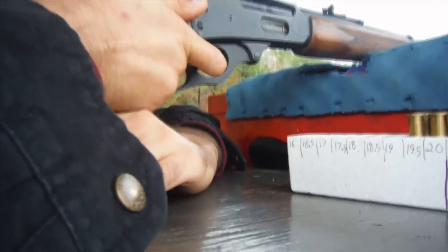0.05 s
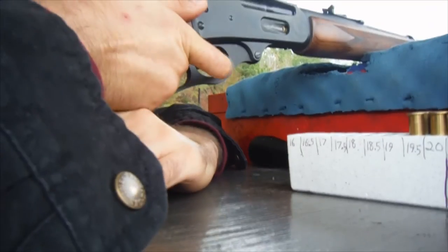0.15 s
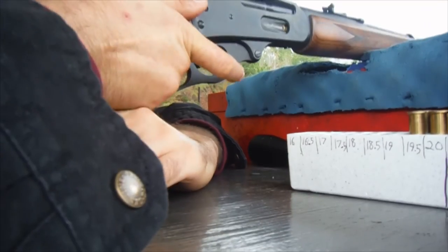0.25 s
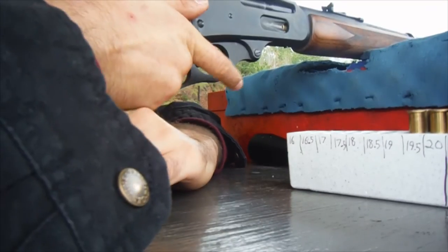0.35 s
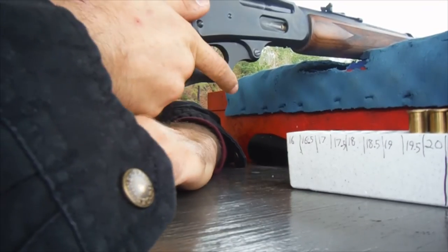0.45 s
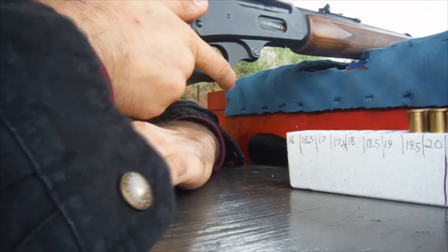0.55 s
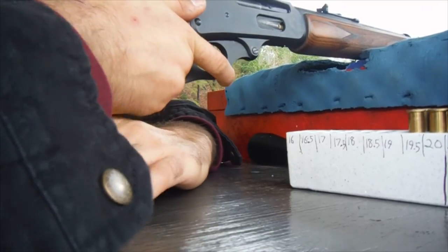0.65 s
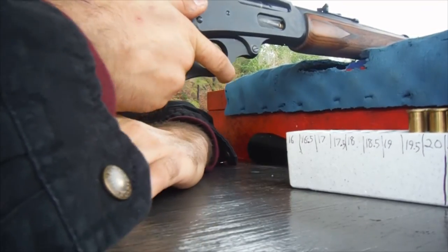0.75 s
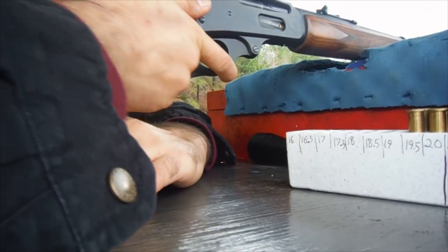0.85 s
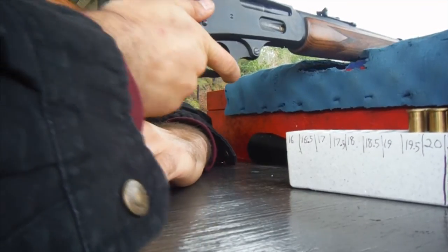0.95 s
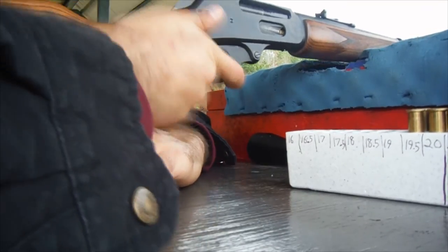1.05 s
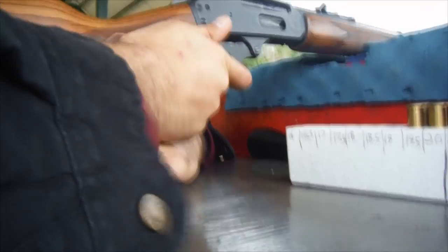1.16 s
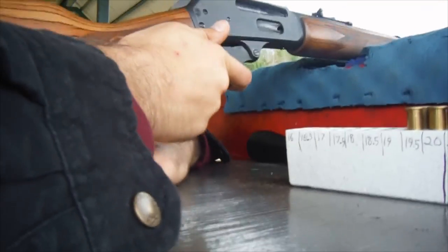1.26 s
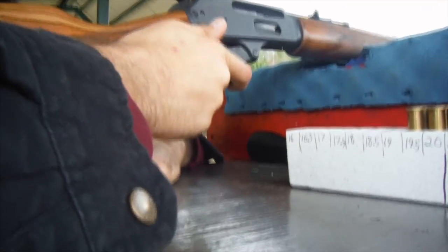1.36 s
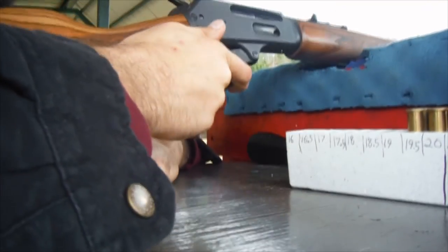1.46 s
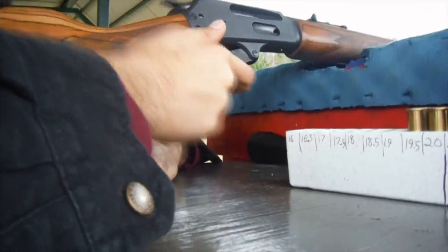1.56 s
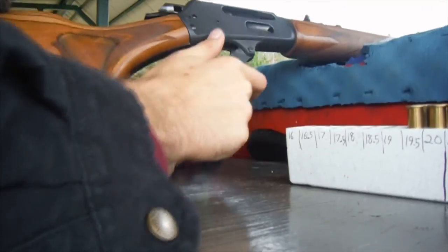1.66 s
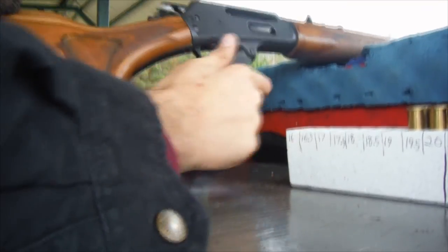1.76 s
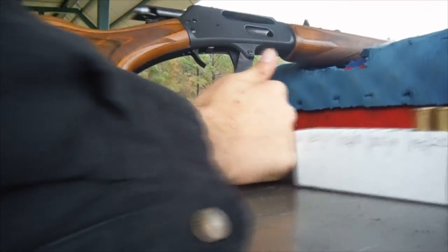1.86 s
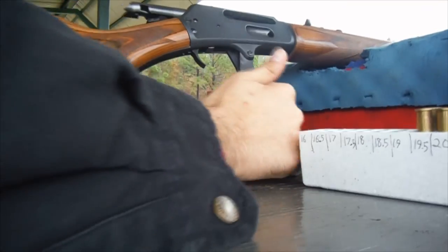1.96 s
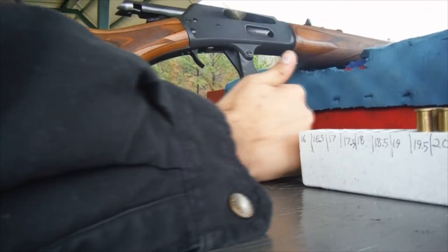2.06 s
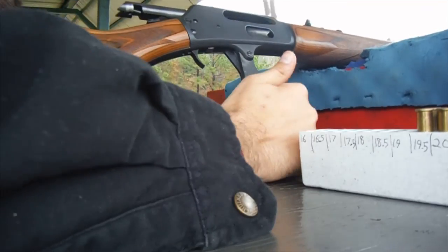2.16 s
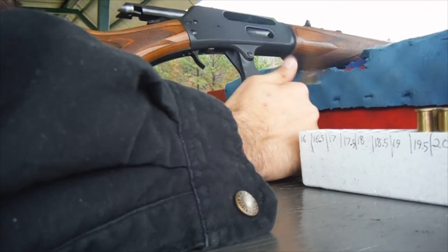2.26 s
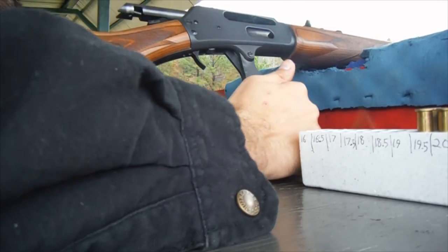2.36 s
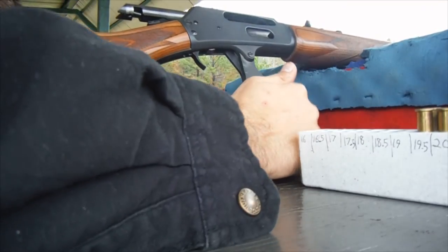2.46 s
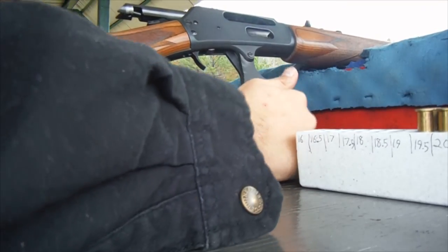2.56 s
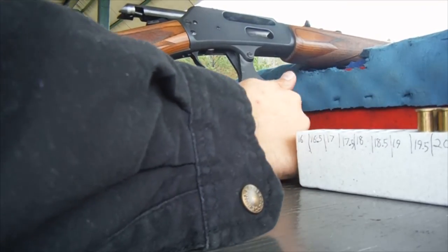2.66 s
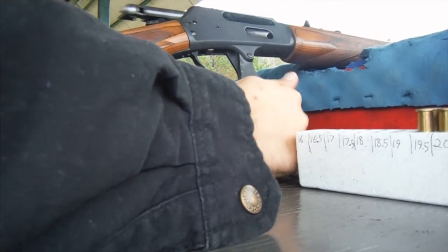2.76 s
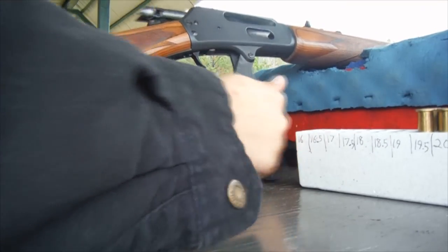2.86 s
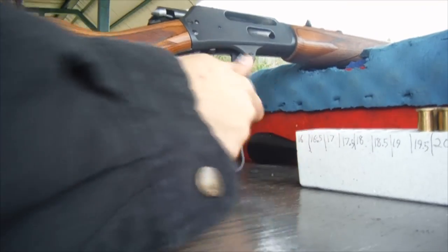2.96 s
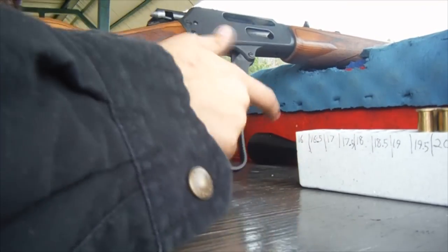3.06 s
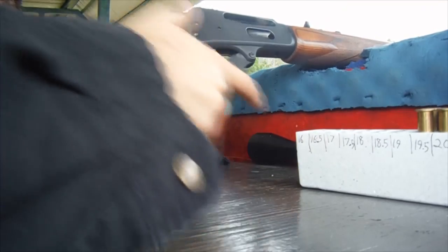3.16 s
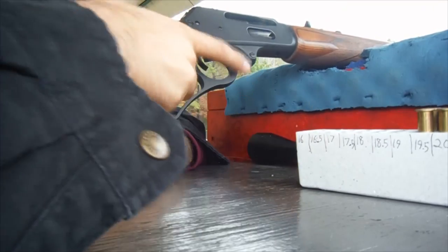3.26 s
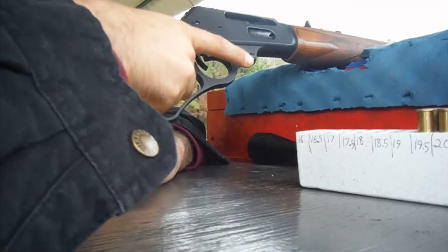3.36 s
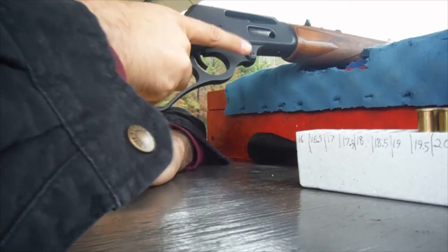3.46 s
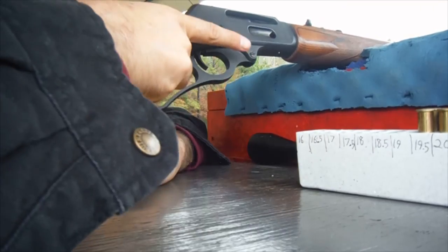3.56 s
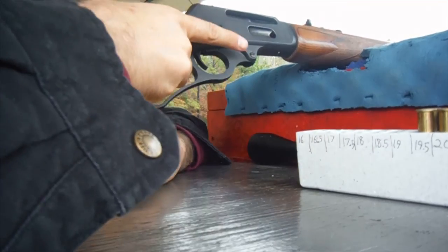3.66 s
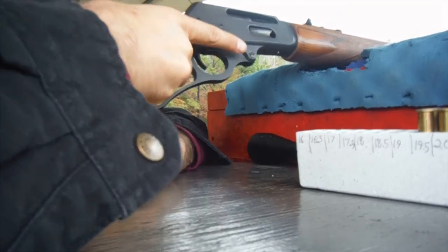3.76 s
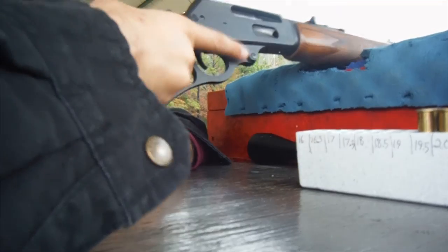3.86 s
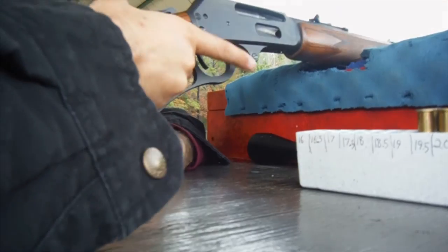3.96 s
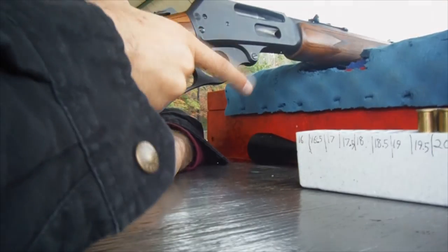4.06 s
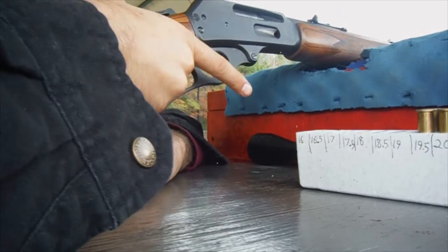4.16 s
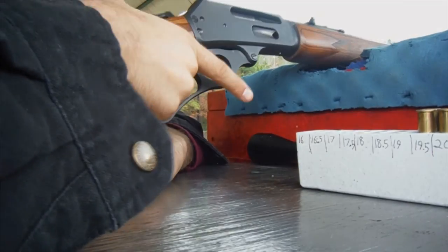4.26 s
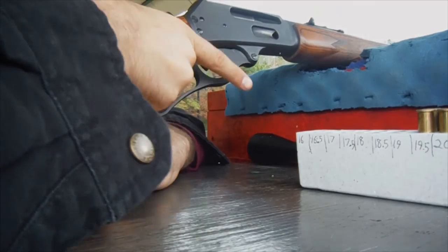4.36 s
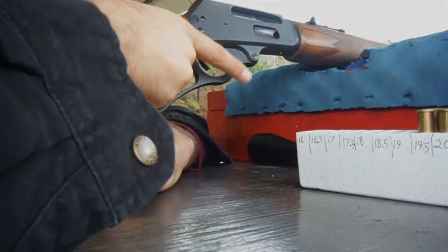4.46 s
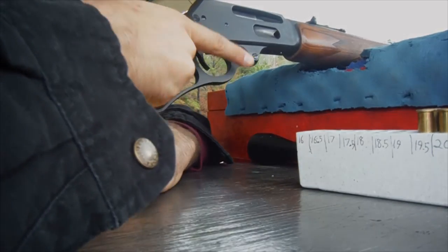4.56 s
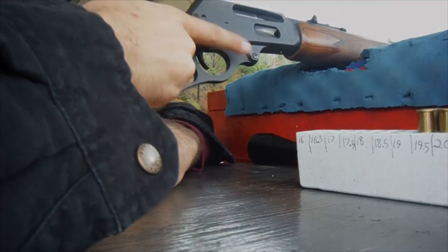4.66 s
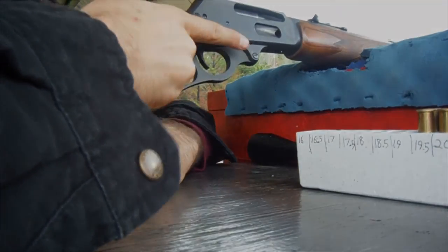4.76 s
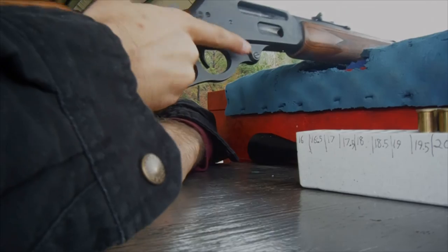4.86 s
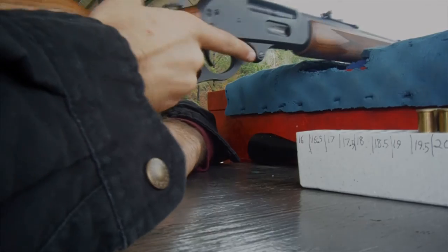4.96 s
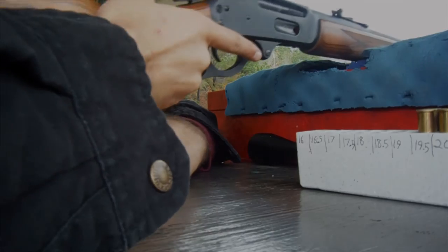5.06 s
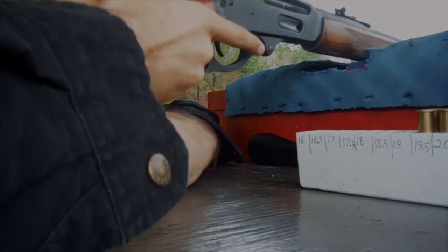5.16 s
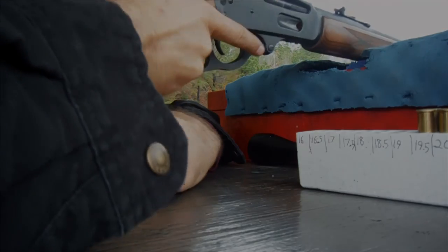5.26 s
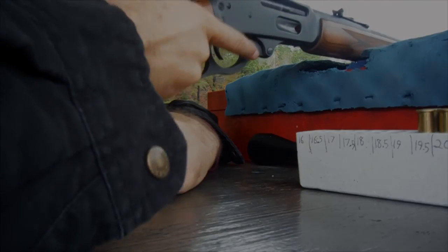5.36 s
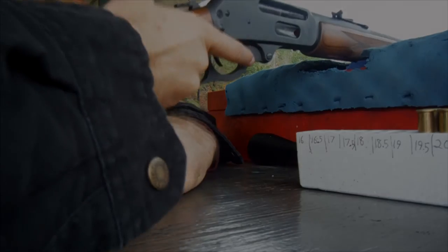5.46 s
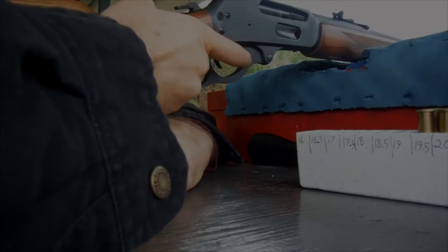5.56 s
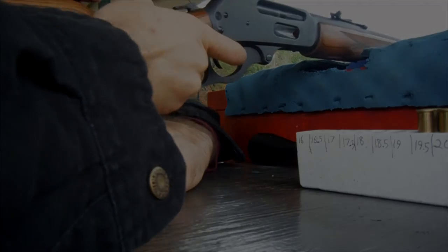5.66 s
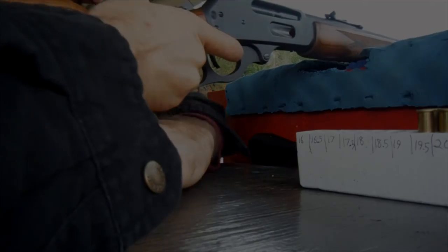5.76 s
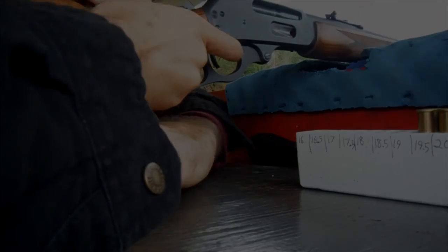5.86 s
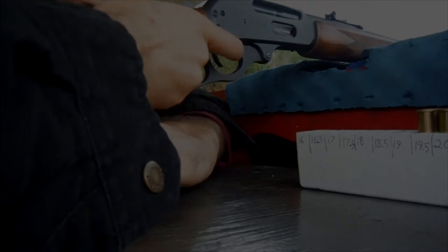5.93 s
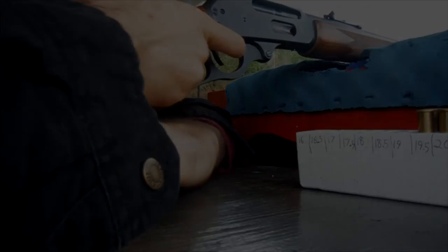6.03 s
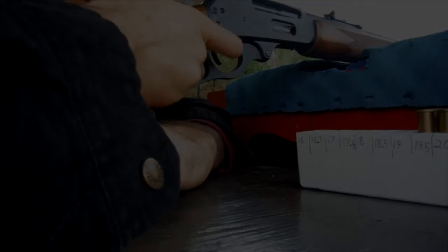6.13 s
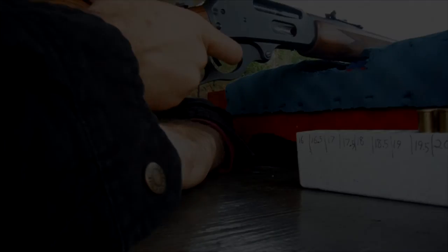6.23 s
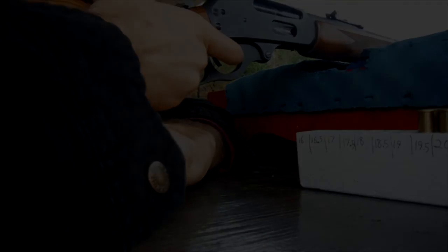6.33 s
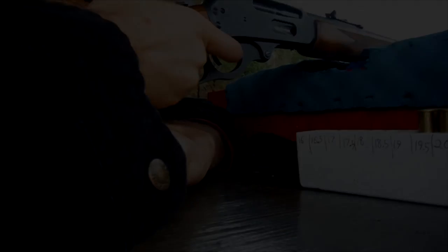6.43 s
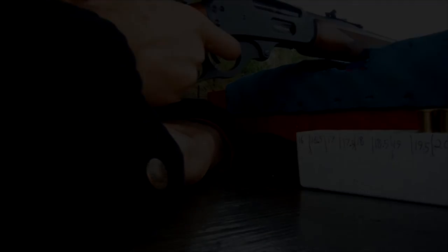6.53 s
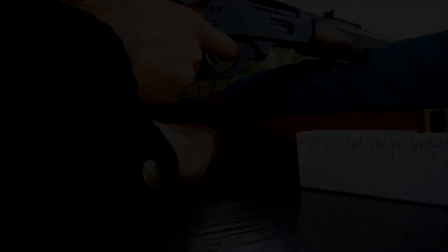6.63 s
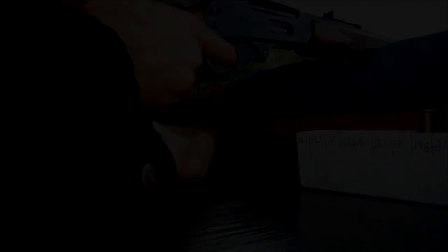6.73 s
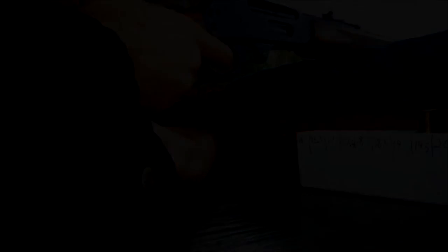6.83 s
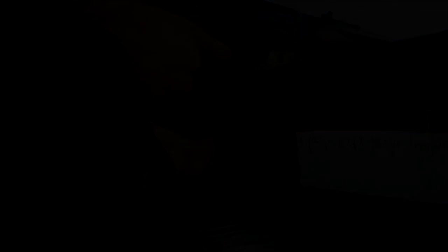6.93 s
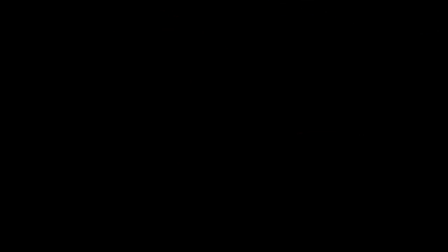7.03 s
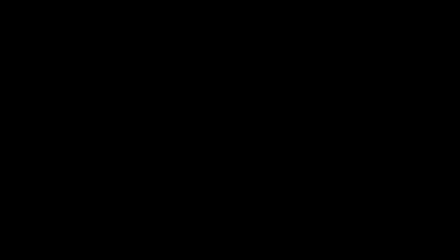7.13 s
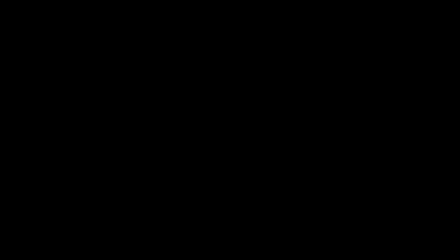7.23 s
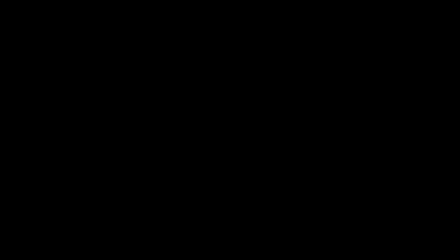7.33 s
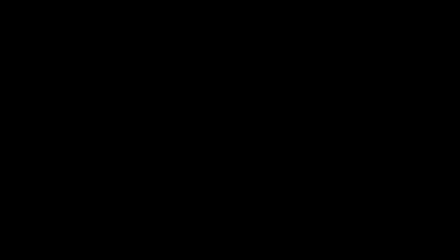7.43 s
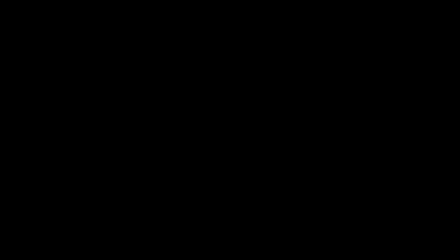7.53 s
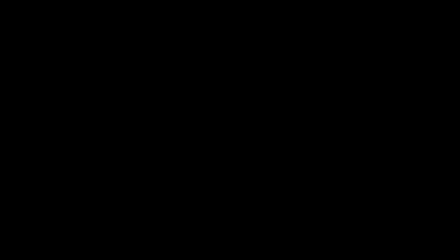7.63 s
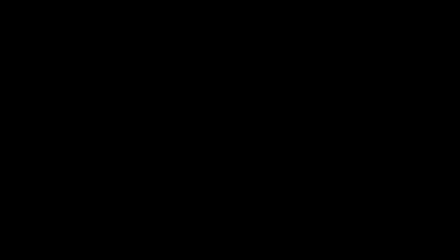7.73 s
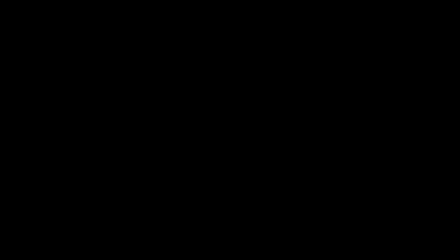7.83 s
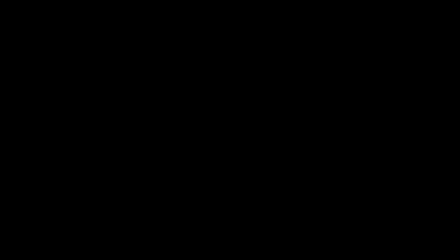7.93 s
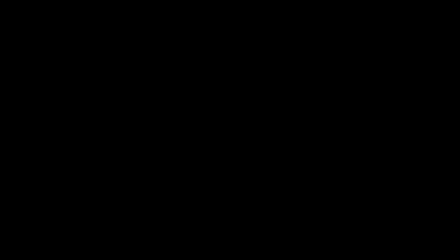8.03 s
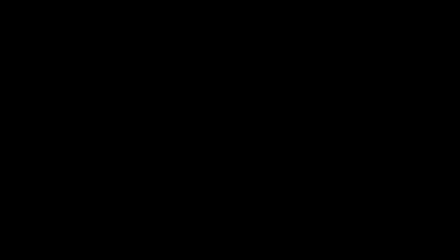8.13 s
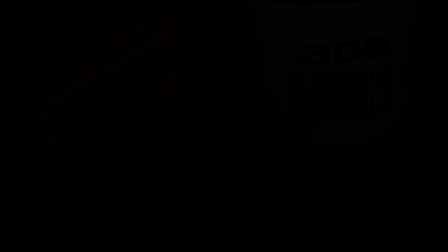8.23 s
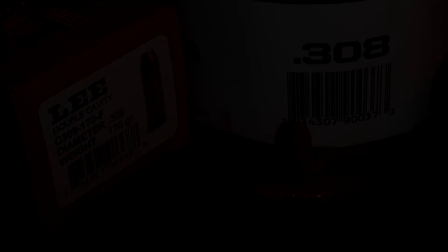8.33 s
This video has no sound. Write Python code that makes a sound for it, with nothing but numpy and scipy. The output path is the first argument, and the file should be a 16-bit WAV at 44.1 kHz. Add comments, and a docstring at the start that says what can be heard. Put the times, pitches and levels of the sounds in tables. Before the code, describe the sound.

The stretch opens on the rolling echo of a rifle shot, a broad noisy wash with a low wind buffet, losing level and treble until about 2 s. Close to the microphone, a sharp click at 1.16 s starts the lever stroke: low wooden bench thumps, the strongest near 1.3, a very hard steel clack at 1.65, smaller clicks at 1.86, and a bright clack at 2.15. An empty brass case then rings high and shimmering for a quarter second and bounces on the bench at 2.47-2.6 with duller clicks. Light rattles and a scrape follow to 3.0; closing clacks come at 3.26 and 3.53. Tiny pings, soft knocks and low bumps thin out from 3.6 to 6.2. Thin hiss fades from 5.3 to near silence by 7.7, with faint bumps around 7.5. Then duller outdoor air enters with faint hum, a soft gust and barely audible ticks after 8.2.

```python
"""The echo of a rifle shot rolls away over a range: noise that falls in level and loses treble. Then the lever
is worked on a wooden bench close by: noise clicks ring steel modes, strokes rub, thumps ring the bench. An
empty brass case, four dying sines, flies out ringing and bounces on the bench; a loaded round and the lever
spring ring, and faint high ticks sound. The background of hiss, thin tones and early wind fades out; a new,
duller outdoor air with a faint hum and fresh gusts comes in at the end."""
import sys
import numpy as np
from scipy import signal
from scipy.io import wavfile
from scipy.ndimage import uniform_filter1d

SR = 44100
rng = np.random.default_rng(int(sys.argv[2]) if len(sys.argv) > 2 else 0)


def unload_wav(signal):
    """Save mono or channel-first audio to the path in sys.argv[1] as 16-bit WAV at rate SR, clipped to [-1, 1]."""
    wavfile.write(
        sys.argv[1],
        SR,
        np.round(np.clip(np.atleast_2d(signal).T, -1, 1) * 32767).astype(np.int16),
    )


N = 369999  # samples

# strokes of metal or sleeve: (start t/s, length/s, hiss level/dB, level of wood set droning/dB, share spent rising)
STROKES = [(1.157, 0.052, -40.5, -69.5, 0.19), (1.276, 0.09, -68, -53, 0.2),
           (1.677, 0.15, -56.5, -54.5, 0.13), (1.884, .12, -45.5, -64, 0.41), (1.967, .08, -59.5, -68, .4),
           (2.029, .08, -56, -44, 0.15), (2.483, 0.039, -39, -41, 0.099), (2.599, 0.13, -67, -47.5, 0.22),
           (2.7, .11, -62, -81, .3), (2.848, 0.22, -53, -54.5, 0.43), (3.2, 0.09, -67, -106, 0.26),
           (3.24, 0.069, -54.5, -112, 0.31), (3.556, 0.2, -89, -90.5, 0.13), (4.202, 0.29, -73, -68, 0.67),
           (5.003, 0.32, -77, -71.5, 0.45), (5.46, 0.21, -74, -72, 0.48), (5.933, 0.3, -78, -81, 0.39)]
# hard knock on wood, also the drone of rubbed wood: (f/Hz, relative level/dB, t60/s)
KNOCK_MODES = [(480, -13.5, 0.053), (562, -4, 0.014), (680, -6.5, 0.02), (920, -8, 0.023), (1920, -11, .03)]
FADE_S, NEW_S = 5.28, 7.754  # s: the old background starts to sink; it is gone and the new air enters


def amp(db):
    """Level in dB to amplitude."""
    return 10 ** (np.asarray(db) / 20)


def evened(x):
    """Scale to rms 1."""
    return x / np.sqrt(np.mean(x ** 2) + 1e-20)


def read(points, hz):
    """Read a curve of (f/Hz, value) along a log frequency axis."""
    f, value = np.transpose(points)
    return np.interp(np.log(hz + 1), np.log(f + 1), value)


def follow(rows, t, off_db=-140):
    """Follow a level curve of (t/s, level/dB), practically silent outside it."""
    s, db = np.transpose(rows)
    return np.interp(t, s, db, left=off_db, right=off_db)


def swell(t, s, length, rising):
    """One straight rise and fall in amplitude."""
    peak_s = s + np.clip(rising, .02, .98) * length
    return np.interp(t, [s, peak_s, s + length], [0, 1, 0])


def fade(t):
    """The old background sinks evenly in amplitude to silence."""
    return np.clip((NEW_S - t) / (NEW_S - FADE_S), 0, 1)


def add(mix, s, sound):
    """Lay a sound into the mix at s seconds."""
    part = mix[round(s * SR):][:len(sound)]
    part += sound[:len(part)]


def ring(modes, s, gains=1):
    """Struck solid: a sum of dying sines, each lasting a t60 of 3 ms or more."""
    hz, db, t60 = np.transpose(modes)[:, :, None]
    t = np.arange(round(s * SR)) / SR
    decay = amp(db - 60 * t / np.maximum(t60, .003))
    return (gains * decay * np.sin(2 * np.pi * hz * t)).sum(0)


def tones(rows, t):
    """Steady sines from (f/Hz, rms level/dB)."""
    return sum(amp(db) * np.sqrt(2) * np.sin(2 * np.pi * f * t) for f, db in rows)


def noise(colour, patchy_db, loss=((1, 0), (2, 0)), lo_hz=0, hi_hz=22050):
    """Random short-time spectra with drifting patches; rms 1 in the band lo-hi before the losses."""
    hop = 256
    frames, hz = N // hop + 5, np.fft.rfftfreq(1024, 1 / SR)
    real, imaginary, patches = rng.standard_normal((frames, 513, 3)).T
    patches = uniform_filter1d(patches, 10, 0)  # over frequency
    patches = evened(uniform_filter1d(patches, 10, 1))  # over time
    spectra = (real + 1j * imaginary) * amp(read(colour, hz)[:, None] + patchy_db * patches)
    band = spectra[(hz >= lo_hz) & (hz < hi_hz)]
    spectra /= np.sqrt((abs(band) ** 2).sum(0).mean() * 3 / 4)
    spectra *= amp(-read(loss, hz)[:, None] * np.arange(frames) * hop / SR)
    return signal.istft(spectra, nperseg=1024, noverlap=768)[1][:N]


def action():
    """Each contact is a short broad chatter, longer in the bass; all of them ring the modes of the rifle."""
    # steel and brass contacts: (t/s, chatter level over 10 ms/dB, tilt from dull to bright/dB,
    # t60/s, at least 3 ms, stretched in each band)
    clicks = [(1.1386, -53, -2, 0.013), (1.1546, -51, 5, 0.011), (1.1584, -26, 15, 0.0071),
              (1.164, -50, 8, 0.012), (1.176, -33.5, 2.5, 0.012), (1.182, -44, 0, 0.0097),
              (1.203, -42, -4, 0.013), (1.2765, -49, 9, 0.0061), (1.2942, -44, -24, 0.013),
              (1.352, -52, -2.5, 0.0081), (1.444, -56.5, -13, 0.0062), (1.6537, -20, 5, 0.0037),
              (1.673, -36, 8.5, 0.012), (1.6881, -48, 2, 0.011), (1.7194, -56, 0, 0.0094),
              (1.7598, -55, -21, 0.0054), (1.7769, -59, -19, 0.011), (1.8579, -33.5, 10, 0.0051),
              (1.8673, -52.5, -2, 0.021), (1.9349, -42, -25, 0.018), (1.9385, -38.5, -5.5, 0.015),
              (1.96, -47, -13, 0.011), (1.969, -48, 10, 0.01), (2.0322, -51.5, 6, 0.0095),
              (2.0502, -46.5, -8.5, 0.014), (2.0801, -54, 1, 0.011), (2.0996, -48, 3, 0.015),
              (2.1152, -55, -3, 0.024), (2.132, -53, -3, 0.019), (2.1487, -24, 9, 0.013),
              (2.159, -34, 9, 0.013), (2.1627, -37, 25, 0.0086), (2.1659, -30, 5.5, 0.0064),
              (2.4731, -36.5, -7.5, 0.012), (2.4849, -43, -8, 0.0065), (2.498, -29.5, -9, 0.014),
              (2.5107, -41, -20, 0.015), (2.55, -47, -26, 0.011), (2.5583, -31, -11.5, 0.014),
              (2.5983, -47, -8, 0.015), (2.6047, -41, -9.5, 0.01), (2.6345, -47, -11, 0.0099),
              (2.6453, -48, -19, 0.012), (2.6772, -48, -9, 0.017), (2.6942, -49, 20, 0.0068),
              (2.7016, -41.5, -0.5, 0.0077), (2.7334, -49, 17, 0.011), (2.7436, -44, 6, 0.0092),
              (2.7897, -62.5, 0, 0.0091), (2.8621, -45.5, -0.5, 0.024), (2.9424, -52.5, 0, 0.017),
              (2.9547, -54, 4, 0.0085), (2.965, -51, -0.5, 0.013), (2.974, -57, 0, 0.011),
              (3.0057, -50, 8, 0.015), (3.0105, -38, 9, 0.0042), (3.0255, -45, -3.5, 0.022),
              (3.2018, -64, -8, 0.012), (3.231, -43.5, -0.5, 0.017), (3.258, -30.5, 11.5, 0.0064),
              (3.277, -51, 1, 0.013), (3.2846, -38, 4, 0.022), (3.2981, -45, -1.5, 0.014),
              (3.3383, -52.5, -4, 0.028), (3.5209, -40, -2.5, 0.011), (3.5261, -33, 0.5, 0.014),
              (3.5332, -28, 8.5, 0.01), (3.5455, -52.5, -9, 0.015), (3.5637, -49.5, 3.5, 0.012),
              (3.5824, -58, -17, 0.013), (3.648, -61.5, -8, 0.023), (4.0746, -54, -6, 0.015),
              (4.2625, -48.5, -10.5, 0.014), (4.2712, -52, -4, 0.013), (4.3918, -44, -7, 0.0062),
              (4.4096, -53, -3, 0.01), (4.7404, -57, 0.5, 0.021), (4.751, -42, 8.5, 0.01),
              (5.5316, -60.5, 4, 0.013), (5.6677, -61.5, -4, 0.014), (8.199, -65.5, -1, 0.011),
              (8.2277, -63.5, -4, 0.0062), (8.3383, -67.5, -2, 0.013)]
    # receiver, lever and stock: (f/Hz, relative level/dB, t60/s)
    body_modes = [(564.5, 3, 0.054), (950, 3, 0.023), (1268, -9, 0.028), (1702, -2.5, 0.028),
                  (2076, 4.5, 0.014), (2610, -3.5, 0.02), (3033, 3.5, 0.024), (3350, 1.5, 0.0044),
                  (4150, -4, 0.036), (4920, -0.5, 0.042), (6230, -1.5, 0.013), (6730, -11.5, 0.002),
                  (8970, 6, 0.021), (11050, -0.5, 0.017), (11800, -2, 0.027)]
    bass_db, bass_tilt = -11, 1.7  # only dull contacts reach below 1 kHz
    middle_db = 0.5  # 2.5-7 kHz against the mean of its neighbours
    ring_db, ring_spread_db = -6.5, 4.5  # each contact strikes another spot, so the modes answer unevenly
    edges_hz = ((450, 1000), (1000, 2500), (2500, 7000), (7000, 12600))
    lasts = np.array([[2.1], [1.8], [1.2], [1.0]])  # stretch of t60 in each band
    out, t = np.zeros(N), np.arange(2000) / SR
    bands = [signal.butter(2, edges, "band", fs=SR, output="sos") for edges in edges_hz]
    modes = np.array([ring([mode], .08) for mode in body_modes])
    for s, db, tilt_db, t60 in list(clicks) + catches():
        raw = rng.standard_normal((4, len(t) + 200))
        grit = np.array([signal.sosfilt(band, v) for band, v in zip(bands, raw)])[:, 200:]
        attack = np.minimum(t / 0.00061, 1)
        chatter = grit * amp(-60 * t / (max(t60, .003) * lasts)) * attack
        chatter *= np.sqrt(SR / 100) / np.linalg.norm(chatter, axis=1, keepdims=True)  # rms 1 over 10 ms
        shares = amp([bass_db - bass_tilt * tilt_db, -tilt_db, middle_db, tilt_db])
        contact = amp(db) * shares / np.linalg.norm(shares) @ chatter
        body = amp(ring_spread_db * rng.standard_normal(len(modes))) @ modes
        add(out, s, contact)
        add(out, s, amp(ring_db) * signal.fftconvolve(contact, body / np.linalg.norm(body)))
    return out


def catches():
    """Random small contacts scattered through each stroke, their level following the stroke's."""
    per_s, t60 = 130, 0.019  # catches per s, s
    grit_db, spread_db, tilt_db = -9, 5.5, -6
    rows = []
    for s, length, hiss_db, wood_db, rising in STROKES:
        for step, (late, size, tone) in enumerate(rng.random((50, 3))):
            at = s + (step + late) / per_s
            level_db = max(hiss_db, wood_db) + grit_db + spread_db * (2 * size - 1)
            level_db += 20 * np.log10(swell(at, s, length, rising) + 0.085)
            if at < s + length:
                rows.append((at, level_db, tilt_db + 4 * (2 * tone - 1), t60))
    return rows


def case():
    """In the air the case tumbles, turning its loud sides to and fro, and its pitch bends with its speed."""
    # the empty case is struck: (t/s, ringing length/s, level/dB, where)
    case_hits = [(2.081, 0.1, -47.5, "held"), (2.161, 0.28, -28, "air"), (2.474, 0.035, -34.5, "bench"),
                 (2.512, 0.084, -39.5, "bench"), (2.6, 0.038, -39, "bench"), (2.625, .05, -49, "bench")]
    # the case's four modes: (f/Hz)
    case_hz = [7548, 10698, 12258, 14958]
    # their dying times: (t60/s)
    case_t60 = [0.13, 0.41, 0.33, 0.29]
    # relative level of the four modes in each place: (level/dB)
    place_db = {"held": [4.5, -1.5, -16, -10], "air": [-3, 4.5, 4.5, 1.5], "bench": [-12, -7, 2.2, -19.5]}
    # attack in each place, the ring frees itself as the case leaves the rifle: (rise/s)
    rise_s = {"held": .0006, "air": .012, "bench": .0006}
    # each mode's pattern of loud sides: (cycles per turn, offset/cycles)
    lobes = [(1.6, -0.052), (1.2, .03), (0.57, .12), (.52, .01)]
    turns_per_s = 5
    away_m_s, pull_m_s2, sound_m_s = .6, 6.5, 343  # in the air it flies off, then falls nearer
    out = np.zeros(N)
    cycles, offset = np.transpose(lobes)[:, :, None]
    hz, t60 = np.array([case_hz, case_t60])[:, :, None]
    for s, length, db, where in case_hits:
        t = np.arange(round(length * SR)) / SR
        facing, heard = 1, t
        if where == "air":
            facing = .2 + np.cos(2 * np.pi * (turns_per_s * t * cycles + offset))
            distance_m = away_m_s * t - pull_m_s2 * t ** 2 / 2
            heard = t - distance_m / sound_m_s
        modes = amp(db + np.c_[place_db[where]] - 60 * t / t60) * np.sin(2 * np.pi * hz * heard)
        edges = np.minimum(np.minimum(t / rise_s[where], 1), (length - t) / .006)
        add(out, s, (facing * modes).sum(0) * edges)
    return out


def bench():
    """A soft push of a few ms bends the top, rings boards and hollow and sets the legs swaying."""
    # knocks through the bench: (t/s, level of the boards/dB, direction +-1,
    # then against the boards: hard knock/dB, sway of the legs/dB, hollow/dB)
    thumps = [(1.201, -27, 1, -6, -16, -30), (1.219, -30.5, -1, -1, -19, -27),
              (1.2496, -33, -1, 3.5, -15, -14), (1.2863, -24, 1, -7.5, -25, -24),
              (1.2919, -14, 1, -6, -39, -27), (1.3317, -23, -1, -4, -30, -38),
              (1.4236, -23, 1, -10, -22, -33), (1.444, -26, -1, -8, -21, -31),
              (1.5332, -24.5, 1, -13, -22, -28), (1.552, -34.5, -1, 2, -22, -24),
              (1.6133, -33, 1, -6, -9, -24), (1.6975, -25.5, 1, -12, -22, -29),
              (1.7153, -32, -1, -17, -13, -29), (1.8188, -23, 1, -30, -25, -39),
              (1.8415, -26, -1, -3, -15.5, -31), (1.9188, -23, 1, -14, -25, -29),
              (1.9411, -25, -1, -2, -24, -27), (2.0503, -49, 1, 7, -11.5, 0),
              (2.4774, -48.5, -1, 16, -27, -4), (2.5583, -49.5, 1, 3, -20, 10.5),
              (2.597, -56, -1, 20, -19, -9), (2.8673, -32.5, -1, 9.5, -15, -9),
              (2.9481, -24.5, 1, -13, -30, -32), (2.9659, -28, -1, -7, -19, -34),
              (3.0589, -25, 1, -8, -15, -36), (3.291, -42.5, 1, -13, -9, -16),
              (3.534, -35, 1, -5, -2.5, -16), (3.5913, -30, 1, -9, -17, -24),
              (3.657, -31, 1, -26, -11.5, -28), (3.6968, -35.5, 1, -6.5, -2.5, -22),
              (3.7352, -35, 1, -9, -9, -27), (4.0787, -46.5, -1, -14.5, -1, -1),
              (4.2189, -48, 1, 1.5, -6, -7.5), (4.2699, -51, 1, -1, 3, -6), (4.3005, -38, 1, -9, -12, -15),
              (4.3715, -34, 1, -8, -13, -20), (4.4997, -40, 1, -18, -9.5, -18),
              (4.5514, -39.5, 1, -11, -18, -19), (4.7622, -36.5, 1, -19, -4, -23),
              (4.8605, -39.5, 1, -8, -5.5, -30), (5.8005, -46, 1, -16, -2.5, -27),
              (5.9725, -49, -1, -10, -5, -17), (6.0054, -39, 1, -7, -8.5, -27),
              (6.0827, -46, 1, -12, -9, -18), (6.146, -41.5, 1, -1.5, -8, -18),
              (6.1755, -38.5, 1, -32.5, -7, -33), (6.4451, -60, 1, -5.5, 5.5, -29.5),
              (7.0551, -67, 1, 0, 10.5, -24), (7.4036, -51, -1, -12, -11.5, -27),
              (7.4668, -41.5, 1, -12, -22, -31.5), (7.4827, -53.5, -1, 4, -15, -26.5),
              (7.5414, -48.5, 1, -9.5, -16, -25.5), (7.591, -56.5, 1, -9, -13.5, -23)]
    # boards of the top: (f/Hz, relative level/dB, t60/s)
    board_modes = [(100, -4.5, 0.029), (143, -10, 0.053), (231, -8, 0.079)]
    # swaying legs: (f/Hz, relative level/dB, t60/s)
    sway_modes = [(40, 0.5, .5), (70.5, -4.5, .16)]
    # hollow under the top: (f/Hz, relative level/dB, t60/s)
    hollow_modes = [(276, 5, 0.23), (300, -5, 0.093)]
    rings = np.array([ring(modes, 0.84) for modes in (board_modes, sway_modes, hollow_modes, KNOCK_MODES)])
    # the top springs back: no slow push is heard
    rings[0] = signal.lfilter(*signal.butter(2, 85, "high", fs=SR), rings[0])
    for k, push_s in enumerate((0.0028, .008, 0.0015, 0.0015)):
        push = signal.windows.hann(round(push_s * SR))
        rings[k] = np.convolve(rings[k], push / push.sum())[:rings.shape[1]]
    out = np.zeros(N)
    for s, db, way, hard_db, sway_db, hollow_db in thumps:
        gains = amp(db) * np.r_[1, amp([sway_db, hollow_db, hard_db])]
        add(out, s, np.sign(way) * gains @ rings)
        for late, size in rng.random((3, 2)):  # the load settles in small uneven rebounds, without sway
            rebound = gains[[0, 2, 3]] @ rings[[0, 2, 3], :8000]
            add(out, s + 0.0097 + 0.02 * late, 0.13 * (2 * size - 1) * rebound)
    return out


def small_parts():
    """Round and lever spring, each ringing its own modes, and faint high ticks."""
    # the loaded round is jogged: (t/s, level/dB, added to the mode's)
    round_hits = [(2.734, -50), (2.745, -51), (2.79, -61), (2.944, -49), (2.966, -42), (2.974, -45),
                  (3.285, -51)]
    # loaded round: (f/Hz, relative level/dB, t60/s)
    round_modes = [(4830, -3, 0.12), (11630, 2.5, .05)]
    # faint high ticks: (t/s, level/dB, added to the mode's)
    ticks = [(3.6162, -61), (3.648, -56), (3.68, -68), (3.7299, -67), (3.7968, -65.5), (3.8501, -65),
             (3.9476, -66), (4.0138, -65), (4.1135, -64), (4.147, -64), (4.1799, -64.5), (4.2467, -65),
             (4.3126, -59), (4.365, -58)]
    # the ticks: (f/Hz, relative level/dB, t60/s)
    tick_modes = [(5270, 4.5, .016)]
    # the lever spring hums: (t/s, level/dB, added to the mode's)
    spring_hits = [(1.725, -49.5), (1.842, -48.5)]
    # lever spring: (f/Hz, relative level/dB, t60/s)
    spring_modes = [(2270, -1, 0.11)]
    out = np.zeros(N)
    for hits, modes in ((round_hits, round_modes), (ticks, tick_modes), (spring_hits, spring_modes)):
        for s, db in hits:
            add(out, s, amp(db) * ring(modes, .2))
    return out


def slide(t):
    """Rubbing: a faint rustle and single strokes, noise that catches and slips in small uneven jerks."""
    # colour of the hiss: (f/Hz, relative level per Hz/dB)
    slide_colour = [(120, -32), (200, 1), (366, -8.5), (569, -10.5), (683, -10.5), (1910, -13.5),
                    (7410, -27), (8120, -24), (16000, -33.5)]
    rustle_db, rustle_s = -74.5, 1  # the rustle grows for 1 s from here
    hiss = amp(rustle_db) * fade(t) * np.clip(t - rustle_s, 0, 1)
    drone = np.zeros(N)
    for s, length, hiss_db, wood_db, rising in STROKES:
        stroke = swell(t, s, length, rising)
        hiss = hiss + amp(hiss_db) * stroke
        drone = drone + amp(wood_db) * stroke
    jerks = amp(2.3 * evened(uniform_filter1d(rng.standard_normal(N), 90)))
    grit = rng.standard_normal(N) * (rng.random(N) < .02)  # sparse grains set the wood ringing
    wood = evened(signal.oaconvolve(grit, ring(KNOCK_MODES, .04))[:N])
    return jerks * (hiss * noise(slide_colour, 2, lo_hz=568, hi_hz=6144) + drone * wood)


def rumble(t):
    """Lumpy low noise through the bench."""
    # course of the rumble: (t/s, level/dB)
    rumble_level = [(1.2, -56), (2.03, -50), (2.27, -57), (2.97, -59.5), (4.01, -64), (4.37, -48),
                    (4.62, -63), (4.96, -55.5), (5.2, -66), (5.8, -66), (6.16, -55), (6.58, -76),
                    (7.37, -77), (7.7, -69)]
    # colour of the rumble: (f/Hz, relative level per Hz/dB)
    rumble_colour = [(15, -9.5), (35, 5), (70, -1.5), (130, -12), (280, -18), (600, -36.5), (1200, -50.5)]
    lumps = evened(uniform_filter1d(rng.standard_normal(N), 1500))
    return amp(follow(rumble_level, t) + 2.0 * lumps) * noise(rumble_colour, 1.0, hi_hz=250)


def surroundings(x):
    """Bench, rest and roof throw a short dense tail back: random sparse reflections that die away."""
    t = np.arange(round(.3 * SR)) / SR
    reflections = rng.choice([-1., 1.], len(t)) * (rng.random(len(t)) < .1)
    decay = amp(-60 * t / 0.11) + amp(-7.5 - 60 * t / 0.16)
    tail = reflections * decay * (t > .002)
    tail = signal.lfilter([1], [1, -.3], tail)  # slightly duller
    return signal.oaconvolve(x, tail / np.linalg.norm(tail))[:N]


def echo(t):
    """The shot comes back from ever farther away, weaker and duller."""
    # colour at the start: (f/Hz, relative level per Hz/dB)
    echo_colour = [(41, -39.5), (70, -15), (124, 0.5), (307, -2.5), (579, -12.5), (797, -8), (2020, -10),
                   (3650, -16), (4690, -13.5), (7220, -24), (8660, -19), (11500, -37.5), (16000, -51)]
    # longer paths lose treble: (f/Hz, loss per s/dB)
    air_loss = [(500, 0), (2000, 5), (4000, 14), (8000, 38.5), (16000, 57)]
    start_db, fall_db, bend, end_s = -36.5, 8, 1.71, 2  # falls fall_db x (t / 1 s) ^ bend
    level = amp(start_db - fall_db * t ** bend) * (t < end_s)
    return level * noise(echo_colour, 1.5, air_loss, 300, 4900)


def wind(t):
    """Slow lumpy pressure below the range of pitch."""
    # gusts: (start t/s, length/s, level at the crest/dB, share spent rising)
    gusts = [(-.1, 0.29, -30, 0.38), (.18, 1.3, -42, 0.22), (7.743, 0.13, -47.5, 0.57),
             (7.845, 0.73, -43, 0.12)]
    slow = sum(np.sin(2 * np.pi * (f * t + rng.random())) for f in np.geomspace(5, 24, num=12))
    return evened(slow) * sum(amp(db) * swell(t, s, length, rising) for s, length, db, rising in gusts)


def background(t):
    """Hiss with two thin tones, fading out; then the new air with a faint hum."""
    # colour of the old hiss: (f/Hz, relative level per Hz/dB)
    old_colour = [(20, 23), (60, 17), (130, 7), (300, 9), (700, 4), (1500, -2.5), (4000, -4), (9000, -5),
                  (15300, -8.5), (16500, -16.5)]
    # thin steady tones: (f/Hz, level over the hiss/dB)
    whine = [(7837.3, -6), (7897.2, -8)]
    # colour of the new air: (f/Hz, relative level per Hz/dB)
    new_colour = [(24, -31), (40, -1.5), (65, -15), (324, -14), (497, -15), (1060, -22), (1940, -30),
                  (2690, -31), (5180, -38), (13500, -42.5), (16500, -53)]
    # faint hum in the new air: (f/Hz, level/dB)
    hum = [(317.6, -75.5), (1087, -82), (2595, -84)]
    hiss_db, swell_db, swell_s, new_db = -72.5, -16, 0.1, -60  # the old hiss swells in after the shot
    old_level = amp(hiss_db + swell_db * np.exp(-t / swell_s)) * fade(t)
    old = old_level * (noise(old_colour, 0.86, lo_hz=8900, hi_hz=14600) + tones(whine, t))
    new = amp(new_db) * noise(new_colour, 0.79, lo_hz=100) + tones(hum, t)
    return np.where(t < NEW_S, old, new)


def scene():
    """The metal with its short tail, the other near sounds, then the open air."""
    t = np.arange(N) / SR
    metal = action() + small_parts()
    near = metal + amp(-18.0) * surroundings(metal) + case() + bench() + slide(t) + rumble(t)
    return (near + echo(t) + wind(t) + background(t))[None]


def record(dry):
    """The loudest clicks overload softly; then the treble is cut off at the band limit."""
    ceiling, edge_hz = .19, 16300
    held = ceiling * np.tanh(dry / ceiling)
    lowpass = signal.firwin(511, edge_hz, window=("kaiser", 9), fs=SR)
    return signal.oaconvolve(held, lowpass[None], "same")


dry = scene()
out = record(dry)
unload_wav(out)
```